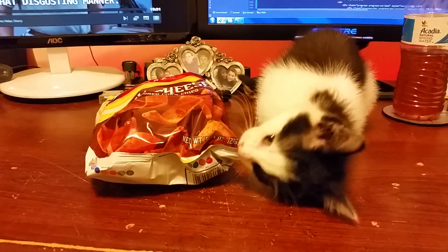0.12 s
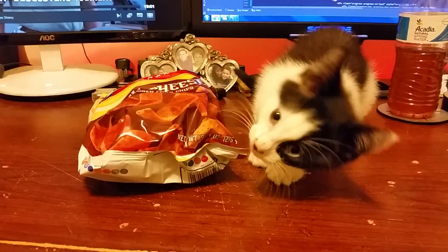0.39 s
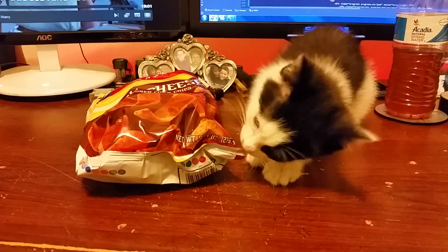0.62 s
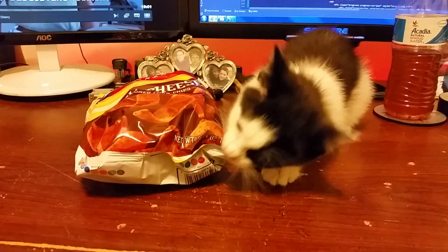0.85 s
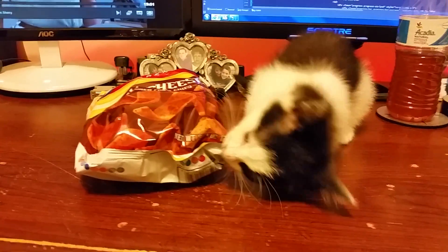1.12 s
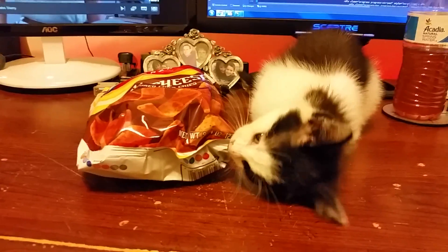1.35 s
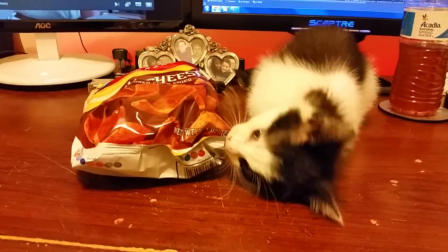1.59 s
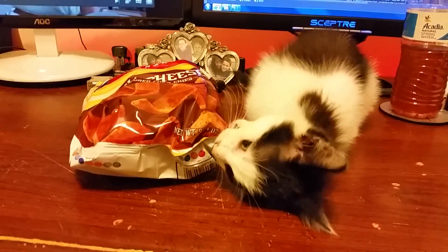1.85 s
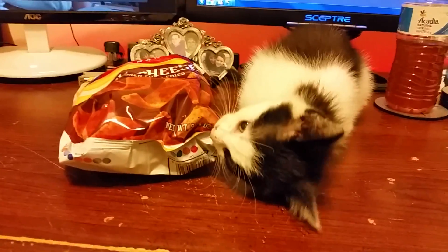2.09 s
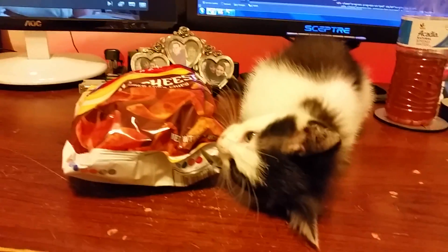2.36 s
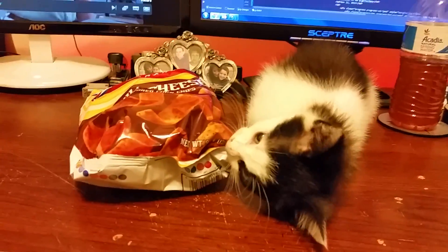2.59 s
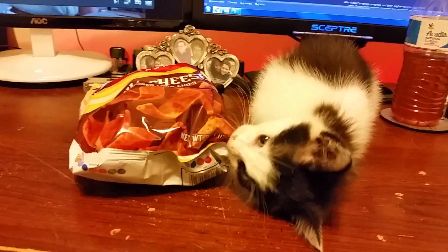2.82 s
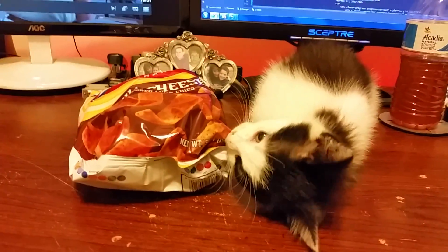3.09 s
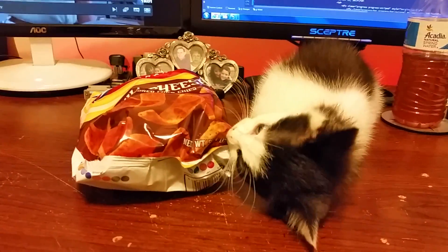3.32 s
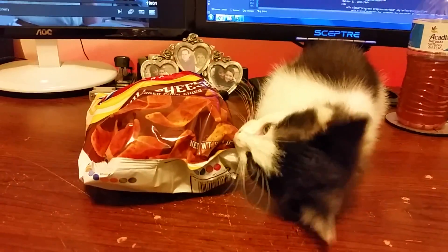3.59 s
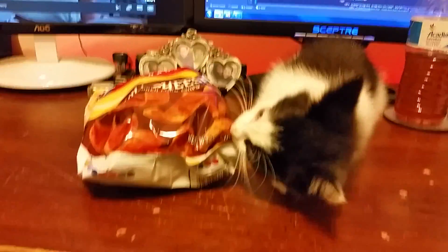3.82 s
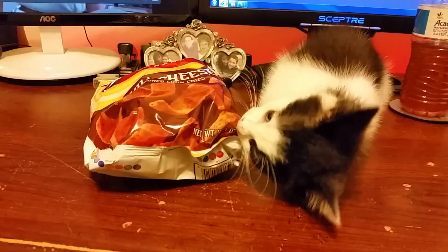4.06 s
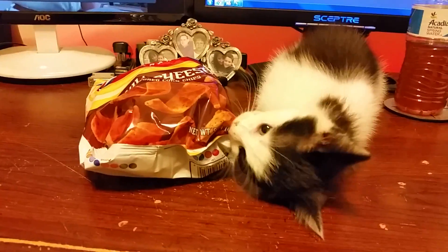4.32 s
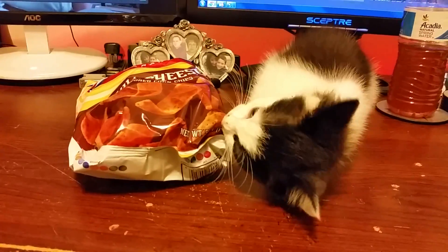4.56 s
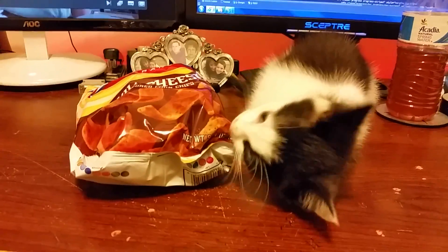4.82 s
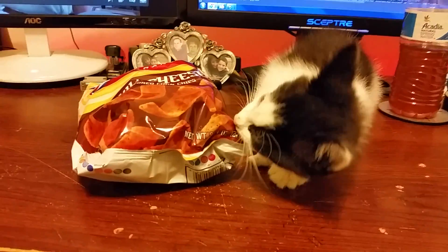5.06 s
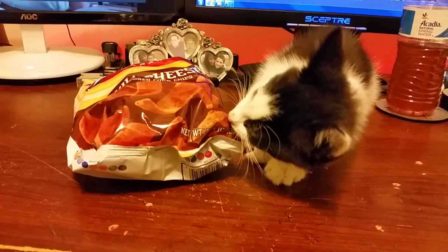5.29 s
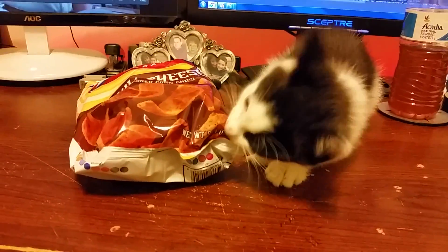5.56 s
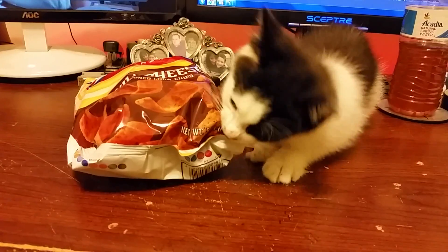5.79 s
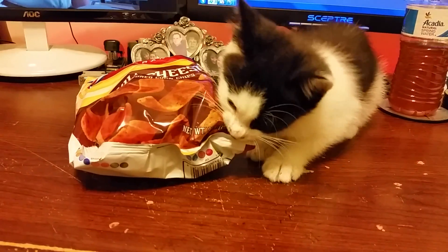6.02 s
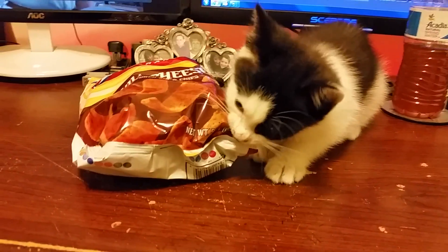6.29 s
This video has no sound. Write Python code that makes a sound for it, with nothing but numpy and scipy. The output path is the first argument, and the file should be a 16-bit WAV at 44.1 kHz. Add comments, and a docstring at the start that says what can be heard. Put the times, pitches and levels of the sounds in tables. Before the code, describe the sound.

Close crinkling of a stiff foil bag, tugged by a kitten, with snaps, tiny clicks, soft fur swishes and one dull desk knock.

```python
"""A foil snack bag crackles on a wooden desk in a small room as a kitten chews and tugs at its corner.
Each crease that buckles gives a click and a short rattle in five bands, with its own colour.
Random finer clicks rustle between, fur hisses as shaped noise, knocks ring the desk's resonances.
Walls answer with a short noise tail; two ports of a hand-held phone colour the bag differently.
Jolts are falling sine pulses; hand rumble, room air and fan hum are filtered noise."""
import sys
import numpy as np
from scipy import signal
from scipy.fft import rfft, irfft, next_fast_len
from scipy.io import wavfile

SR = 44100
rng = np.random.default_rng(int(sys.argv[2]) if len(sys.argv) > 2 else 0)


def undo_db(level):
    """Turn decibels back into plain size, where 20 dB means ten times bigger."""
    steps = np.asarray(level, float) / 20
    return 10 ** steps


def persist_wave(psi):
    """Save psi, clipped to +-1, as 16-bit WAV."""
    counts = np.round(np.clip(psi, -1, 1) * 32767).astype(np.int16)
    wavfile.write(sys.argv[1], SR, np.atleast_2d(counts).T)


N = 282681

# buckling creases, before radiation: t/s, crack/dB, edge/dB (>0 thin, sharp), body/dB (>0 large, hollow),
# bite/dB (>0 stiff, papery)
SNAPS = [(0.0656, -37.5, 7, -6.5, -4), (0.0835, -44, 0, 0, -5), (0.1608, -44.5, 2.5, -0.5, 0),
         (0.277, -41, 3, -7, -8), (0.3474, -41, 2, 8.5, -7), (0.791, -55, 2, 3.5, -4),
         (0.9671, -29.5, -3, 7, -16), (1.0331, -14, -0.5, -17.5, -4), (1.1387, -17, -3, -24, 14),
         (1.16, -16.5, 3, -11, 8), (1.2428, -37.5, -11, -19, 7), (1.256, -38.5, -2, 0, 10.5),
         (1.2597, -10, -10, -18, 5.5), (1.318, -33, 15, -2, 7.5), (1.3328, -35.5, 11, -8, 1),
         (1.4266, -39, -5.5, -13, 4.5), (1.5108, -39.5, 6, -7.5, 0), (1.526, -39, -5, -27, -3),
         (1.569, -34, 8.5, 5.5, 0.5), (1.6153, -39, -2, -18, 1), (1.6765, -37, -10, -17, -11),
         (1.7968, -26, 0, 4.5, -2.5), (1.8151, -37.5, 7.5, 6, 0.5), (1.8729, -32.5, 9, -2.5, 3),
         (1.9104, -34.5, 1.5, -0.5, 8.5), (1.9293, -40, -3, -16, -1), (1.9907, -39, -5, 8, 1.5),
         (1.9997, -23.5, 1.5, -10, 10), (2.0233, -34, -5, -5, 5.5), (2.0384, -36.5, -4, -10, -2),
         (2.049, -39, 9, 9, 2), (2.0972, -27.5, -2.5, -25, 1), (2.1201, -40, -1.5, -18, -18),
         (2.1368, -25, 6.5, -5, 10.5), (2.1808, -12.5, 0.5, -14, 0), (2.1954, -27, -1.5, 8, -1),
         (2.2416, -42.5, 0.5, 0, -4), (2.2878, -25.5, 5.5, -7, -4), (2.3282, -27.5, 8, 6.5, 0),
         (2.3718, -37, 6, 5, 6), (2.4045, -25, -2.5, -33, 1), (2.4657, -68, 5, 23.5, -1),
         (2.5285, -49, 8, -12.5, 0), (2.5918, -46.5, -5, -8.5, 1), (2.6671, -55, 10, 5, -2),
         (2.7652, -47.5, 13.5, -3.5, 1.5), (2.872, -29.5, 4.5, -9, -2), (2.918, -23.5, 3, -11, 1),
         (3.0452, -53.5, 6.5, -1.5, -10), (3.1119, -25, 4.5, -17, -6), (3.1816, -30, 8, 2.5, -11),
         (3.212, -39, 17, -18, -6), (3.2485, -22, 0, -1.5, -11), (3.256, -37.5, 12.5, 5.5, 5.5),
         (3.2755, -44.5, 9.5, -3, 1), (3.3022, -45.5, -0.5, -14, -3), (3.389, -37, 8.5, 6.5, -1.5),
         (3.4464, -29.5, 17.5, 5.5, 5), (3.481, -39.5, -1, -12, -3), (3.4859, -41, 12, -12, 2),
         (3.5287, -47.5, 14, 5, -7), (3.5383, -39.5, 0, -2, 7), (3.6233, -48, 25, 8, -3),
         (3.6266, -21, 14, 5, 1), (3.673, -48, 9.5, 7, 8), (3.6861, -37.5, 8.5, 5.5, 6),
         (3.693, -34.5, 11.5, -2, -4), (3.7191, -20, 6, -8, -1), (3.7233, -21, 11, -5.5, 5.5),
         (3.7372, -34.5, 10.5, 8, 7), (3.739, -19, 4, -14, 4), (3.7991, -39, 8, -2, -7.5),
         (3.8036, -20, 1.5, -7, -2), (3.8541, -44.5, -1, 3, -1), (3.8963, -20.5, 1, -4, 2),
         (3.9537, -35.5, 5, 5.5, -23), (3.9911, -32, 3, -4.5, 6), (4.0094, -53.5, 10.5, 14, -6),
         (4.0401, -42.5, 0.5, -7, -3), (4.1064, -49.5, 15.5, -7, -12), (4.193, -68.5, -3, 26, -19),
         (4.2769, -52, 10, 1, 0), (4.3736, -55, 17.5, 12, -9), (4.4069, -39.5, -6, 6, 5),
         (4.5043, -57.5, 16, 6, -1), (4.5288, -34.5, -1, -6, 1.5), (4.5587, -32.5, 5.5, 7, -17),
         (4.5647, -22, 4, -0.5, 1), (4.5985, -29, 10, 14, -0.5), (4.664, -13.5, 2, -23.5, 2),
         (4.7298, -12.5, 1.5, -27, -6), (4.743, -37, 3, -11, 5), (4.793, -43, 7, -17, 5),
         (4.7976, -44, 13, -12, 0), (4.84, -38, 12, -19, 7), (4.843, -38, 1.5, -24, -4),
         (4.8485, -42, 13.5, 8.5, 6.5), (4.8663, -36.5, 8.5, -5, -11), (4.9124, -25, 11.5, 2.5, 2.5),
         (4.9804, -58, 6.5, 12, 1), (4.9891, -46, 8.5, 4, 4.5), (5.3, -38, 13.5, 8.5, 1.5),
         (5.7019, -46.5, 16, -1, 1), (5.7139, -33, 14, 1, 2), (5.7994, -19.5, 6, -7, 5.5),
         (5.8609, -34, 12, 0.5, 7), (5.8798, -38, 4, -5, 0), (5.906, -46, 4.5, 1, 1),
         (5.923, -43, 11, -3, 3), (5.951, -17.5, 6.5, -14.5, 4.5), (5.9994, -45, 6, -9, 7),
         (6.0368, -23.5, 20.5, -4, 3), (6.109, -40, 1, -18, 11.5), (6.2083, -35, 6, -12.5, 4),
         (6.2524, -35, 1, -11, 6), (6.2562, -25, 6.5, -6.5, 0.5), (6.3317, -39.5, -2, -13, 6.5)]
# bands of a snap, top first: low f/Hz, high f/Hz, radiation/dB, rattle time constant/ms
SNAP_BANDS = [(11570, 19500, 13.5, 0.39), (7820, 10200, 12, 0.33), (3360, 7230, 22.5, 0.34),
              (1213, 3090, 13.5, 0.9), (350, 1900, 18, 3.6)]
# colour of a snap in those bands: plain snap/dB, share of edge/1, of body/1, of bite/1
SNAP_COLOUR = [(-1, 0.98, 0, 0.044), (-0.5, 0.036, 0.1, -0.01), (-5, 0.28, 0.5, 0.83),
               (-0.15, 0.014, 0.92, 0.023), (-18.5, 0.2, 0.79, -0.029)]
# strain of the foil under the teeth, as drive of the fine crackle before radiation: t/s, level/dB
STRAIN = [(0.0, -59), (0.46, -78.5), (0.9, -73.5), (1.15, -50), (1.62, -63), (1.89, -80), (2.21, -48),
          (2.43, -74), (2.8, -78), (3.32, -53.5), (3.82, -52.5), (4.2, -67), (4.75, -56), (5.05, -63.5),
          (5.39, -94), (5.73, -67), (5.9, -66), (6.3, -81)]
# strokes of fur on foil, noise before its bands: t/s, rise/s, fall/s, level/dB, darkness/dB re level
FUR_STROKES = [(0, 0.0031, 0.12, -50, 3), (.2, 0.045, 0.026, -49.5, 0), (.345, 0.013, 0.051, -43.5, -10),
               (0.789, 0.043, 0.0039, -40, -4.5), (0.945, 0.0023, 0.092, -35, 1.5),
               (3.63, 0.017, 0.09, -31.5, 3.5), (4.2, 0.084, 0.074, -47, 1), (4.37, 0.033, 0.047, -43.5, 0),
               (4.48, 0.031, 0.065, -43, 1.5), (5.61, 0.048, 0.098, -53.5, 0.5),
               (5.8, 0.0097, 0.056, -35, -2.5), (5.855, 0.0058, 0.043, -28, -4),
               (5.955, 0.0095, 0.045, -24, -9), (6.04, 0.013, 0.076, -27, -13)]
# jolts of the hand at one port or the other: t/s, starting level/dB, t60/s, left-right/dB
JOLTS = [(.51, -42, 0.027, -13), (2.313, -39.5, 0.03, -12), (2.836, -43, 0.023, 19),
         (3.219, -38, 0.034, 20.5), (3.6231, -19, 0.012, 19), (3.742, -38, 0.035, -8),
         (3.775, -37.5, 0.055, -12), (3.84, -40, 0.044, -7), (4.43, -37, 0.021, -7),
         (4.847, -37, 0.023, 17), (5.625, -45.5, .034, 19), (5.667, -41, 0.028, -13),
         (5.704, -37.5, 0.027, -14)]
# bag on the desk: t/s, level/dB
KNOCKS = [(0.9467, -25.5), (0.966, -6), (6.2556, -25.5)]
# desk-top modes: f/Hz, starting level re knock/dB, width/Hz
DESK_MODES = [(147, -8, 100), (270, 0.5, 105), (400, -2, 170), (613, -3, 160), (847, -2.5, 190),
              (1600, -17, 170)]
# walls; the left port faces the bag, so its treble is drier: f/Hz, t60/s, left/dB, right/dB
WALLS = [(350, 0.23, 0.5, 0.5), (1200, 0.21, -1.5, -0.5), (2313, 0.25, 1, -4), (5000, 0.23, -10, -2.5),
         (11900, .18, -8, -3)]
# single reflections before their high band: delay/ms, left/dB, right/dB
ECHOES = [(2.143, -14, -5.5), (3.914, -16, -8.5), (9.805, -31, -20.5), (11.25, -27, -18.5),
          (13.96, -35.5, -21), (17.6, -30.5, -11.5), (19.23, -16, -18), (20.1, -22.5, -15),
          (48.3, -30, -17.5)]
# gain of the microphone ports: f/Hz, left/dB, right/dB
PORTS = [(300, -15, -14.5), (1135, -16, -16), (1944, -14.5, -13), (2248, -10.5, 3.5), (2754, -15, -7),
         (3050, -29.5, -10.5), (3560, -16, -13), (5440, -36.5, -18.5), (7800, -22.5, -21.5),
         (8660, -2, -35.5), (9480, 3, -16.5), (10700, -5.5, -12), (11830, 2, -8.5), (15300, -8.5, -19.5)]
# relative spectrum of fan and room air: f/Hz, density/dB per Hz
AIR_SPECTRUM = [(20, -10), (60, -2), (110, -5), (230, -5.5), (390, -12.5), (480, -32.5), (780, -21),
                (1200, -38.5), (2250, -23), (2950, -39), (3600, -24.5), (6500, -56.5), (12200, -36.5),
                (14500, -41)]
# left-right likeness of the air: f/Hz, correlation/1
AIR_LIKENESS = [(60, 0.27), (130, 0.25), (300, 1), (640, 0.45), (1400, .03)]
# fan-motor tones: f/Hz, rms/dB, width of each of two resonances/Hz
FAN_TONES = [(120.4, -63.5, 5.7), (216.4, -66, 25), (391.3, -72.5, 7.1)]
# low rumble of the hand that holds the phone: t/s, rms/dB
HAND_RUMBLE = [(0.0, -53), (0.571, -57), (0.93, -52.5), (1.5, -67), (2.12, -61), (2.82, -74), (3.36, -56),
               (3.77, -52.5), (4.19, -58.5), (4.53, -54), (5.43, -63), (5.801, -54), (6.34, -68.5)]

SPOT_SPREAD_MS = 0.05   # standard deviation: creases lie at different spots, so the path to the right port varies
SETTLING_DB, SETTLING_S = -33, 0.032   # creases around a snap settle: level re snap, time constant
FIRST_WALL_MS, BUILD_UP_MS, ECHO_LOW_HZ = 1.4, 3.4, 3720
HALLWAY_DB, HALLWAY_T60_RATIO = -14, 2.6   # weaker, slower tail from the space beyond
RIGHT_LAG_MS = 0.167
AIR_RMS_DB = -59


def band(x, low_hz, high_hz):
    """Butterworth band-pass."""
    return signal.sosfilt(signal.butter(2, [low_hz, high_hz], "band", fs=SR, output="sos"), x + 1e-18)


def resonance(x, hz, width_hz):
    """Two-pole resonance with gain 1 on top."""
    r = np.exp(-np.pi * width_hz / SR)
    poles = [1, -2 * r * np.cos(2 * np.pi * hz / SR), r * r]
    return signal.lfilter([(1 - r * r) / 2, 0, (r * r - 1) / 2], poles, x + 1e-18)


def rms_one(x):
    """Scale to rms 1."""
    return x / np.sqrt(np.mean(x ** 2) + 1e-20)


def at_hz(points, hz, column=1):
    """Read a table on a log-frequency axis."""
    points = np.array(points)
    return np.interp(np.log(np.maximum(hz, 1)), np.log(points[:, 0]), points[:, column])


def at_time(points):
    """Read a table of t/s, level/dB at every sample, as gain."""
    return undo_db(np.interp(np.arange(N) / SR, *np.transpose(points)))


def sides(pan_db):
    """Left and right gains for a left-right difference."""
    return undo_db(np.array([pan_db, -pan_db]) / 2)


def train(times_s, sizes):
    """Stereo one-sample clicks at given times."""
    out = np.zeros((2, N))
    at = np.minimum(np.round(times_s * SR).astype(int), N - 1)
    np.add.at(out, ([[0], [1]], at), sizes)
    return out


def rustle(median_per_s=1100, spread_db=3.5, clumps_db=3.5, bright_db=-7.5, dark_db=2.5, low_db=-2.5):
    """Tiny creases click at random, in clumps, with the strain and for a moment after each snap."""
    s, crack_db, edge_db, *_ = np.transpose(SNAPS)
    shocks = train(s, undo_db(crack_db + np.maximum(edge_db, 0) + SETTLING_DB))[0]
    settling = signal.lfilter([1], [1, -np.exp(-1 / (SETTLING_S * SR))], shocks + 1e-18)
    level = settling + at_time(STRAIN)
    clumps = rms_one(band(rng.standard_normal(N), 6, 34))
    born = rng.random(N) < median_per_s * undo_db(clumps_db * clumps) / SR
    sizes = undo_db(spread_db * np.minimum(rng.exponential(1, N), 5))
    clicks = rms_one(born * sizes * rng.choice([-1, 1], N))
    bright = band(clicks, 7950, 15000)
    dark = band(clicks, 2800, 8740) + undo_db(low_db) * band(clicks, 420, 2750)
    radiation = undo_db(SNAP_BANDS[0][2])
    return level * radiation * (undo_db(bright_db) * bright + undo_db(dark_db) * dark)


def swishes(grain_db=5.5):
    """Fur slides over the foil: a soft grainy hiss that swells and stops, unlike at the two ports."""
    t, bright, dark = np.arange(N) / SR, 0, 0
    for s, rise_s, fall_s, level_db, dark_db in FUR_STROKES:
        stroke = np.interp(t, [s, s + rise_s, s + rise_s + fall_s], [0, 1, 0])
        bright = bright + undo_db(level_db) * stroke
        dark = dark + undo_db(level_db + dark_db) * stroke
    grain = rms_one(band(rng.standard_normal(N), 50, 400))
    fur = rng.standard_normal((2, N)) * undo_db(grain_db * grain)
    return bright * band(fur, 9000, 16000) + dark * band(fur, 500, 8700)


def air():
    """Steady broad noise of fan and room, most alike on both sides near 300 Hz."""
    size = next_fast_len(N)
    hz = np.arange(size // 2 + 1) * SR / size
    mid, side = rfft(rng.standard_normal((2, size))) * undo_db(at_hz(AIR_SPECTRUM, hz))
    alike = np.clip(at_hz(AIR_LIKENESS, hz), 0, 1)
    spectra = np.sqrt(1 + alike) * mid + np.sqrt(1 - alike) * side * [[1], [-1]]
    return undo_db(AIR_RMS_DB) * rms_one(irfft(spectra, size)[:, :N])


def fan_hum():
    """Fan-motor tones waver: noise through narrow resonances, twice each."""
    white, hum = rng.standard_normal(N), 0
    for hz, rms_db, width_hz in FAN_TONES:
        tone = resonance(resonance(white, hz, width_hz), hz, width_hz)
        hum = hum + undo_db(rms_db) * rms_one(tone)
    return hum


def hand_rumble():
    """The holding hand rumbles: low noise, mostly its own in each port."""
    own, shared = rng.standard_normal((2, N)), rng.standard_normal(N)
    return at_time(HAND_RUMBLE) * rms_one(band(own + 0.8 * shared, 45, 311))


def snaps(rattle_db=-1.5, facing_spread_db=2.2):
    """A buckling crease cracks for one sample, then rattles; colour and facing to the ports vary."""
    s, crack_db, *traits_db = np.transpose(SNAPS)
    arrival_s = s + [[0], [SPOT_SPREAD_MS / 1000]] * rng.standard_normal(len(s))
    out, rattle = 0, rng.standard_normal(N)
    facing_db = rng.normal(0, facing_spread_db, (len(s), len(SNAP_BANDS)))
    for k, (low_hz, high_hz, radiation_db, rattle_ms) in enumerate(SNAP_BANDS):
        plain_db, *shares = SNAP_COLOUR[k]
        level_db = crack_db + plain_db + np.dot(shares, traits_db) + radiation_db
        cracks = train(arrival_s, undo_db(level_db) * sides(facing_db[:, k]))
        decay = np.exp(-1 / (rattle_ms * SR / 1000))
        dying = signal.lfilter([0, 1], [1, -decay], cracks + 1e-18)
        width = 2 * (high_hz - low_hz) / SR   # height of a unit click after the band
        burst = cracks / width + undo_db(rattle_db) * dying * rattle / np.sqrt(width)
        out = out + band(burst, low_hz, high_hz)
    return out


def jolts():
    """Each jolt of the hand is a dying sine pulse that falls towards 101 Hz; shorter ones start higher."""
    t, out = np.arange(SR // 8) / SR, np.zeros((2, N + SR))
    for s, start_db, t60_s, pan_db in JOLTS:
        extra_turns = (4.7 / t60_s - 55) * 0.0037 * (1 - np.exp(-t / 0.0066))
        pulse = undo_db(-60 * t / t60_s) * np.sin(2 * np.pi * (101 * t + extra_turns))
        at = round(s * SR)
        out[:, at:at + len(t)] -= undo_db(start_db) * sides(pan_db)[:, None] * pulse
    return out[:, :N]


def knock():
    """The bag strikes the desk top, whose modes ring briefly with alternating sign."""
    s, level_db = np.transpose(KNOCKS)
    blow, out = -train(s, undo_db([level_db, level_db])), 0
    for k, (hz, mode_db, width_hz) in enumerate(DESK_MODES):
        ring = resonance(blow, hz, width_hz) * SR / width_hz / np.pi   # a unit click starts near 1
        out = out + (-1) ** k * undo_db(mode_db) * ring
    return out


def room(x):
    """Single treble reflections within a diffuse wall tail: noise builds up and dies in octave bands."""
    t = np.arange(SR // 2) / SR
    edges_hz, white = 120 * 2. ** np.arange(8), rng.standard_normal((2, len(t)))
    late_s = np.maximum(t - FIRST_WALL_MS / 1000, 0)
    build_up = 1 - np.exp(-late_s / (BUILD_UP_MS / 1000))
    answer = np.zeros((2, len(t)))
    for delay_ms, left_db, right_db in ECHOES:
        answer[:, round(delay_ms * SR / 1000)] = undo_db([left_db, right_db])
    answer = band(answer, ECHO_LOW_HZ, 22000)
    for low_hz, high_hz in zip(edges_hz, edges_hz[1:]):
        centre_hz = np.sqrt(low_hz * high_hz)
        t60_s, left_db, right_db = (at_hz(WALLS, centre_hz, column=c) for c in range(1, 4))
        fall_db = -60 * late_s / t60_s
        dying = build_up * (undo_db(fall_db) + undo_db(HALLWAY_DB + fall_db / HALLWAY_T60_RATIO))
        tail = band(white, low_hz, high_hz) * dying / np.linalg.norm(dying)
        answer += undo_db([[left_db], [right_db]]) * tail
    return signal.oaconvolve(x.mean(0)[None], answer, axes=1)[:, :N]


def ports(x, size=2048):
    """Each port is a small cavity with its own peaks; the right one is farther off and lags."""
    hz = np.arange(size // 2 + 1) * SR / size
    gains = undo_db([at_hz(PORTS, hz, column=1), at_hz(PORTS, hz, column=2)])
    cepstrum = irfft(np.log(gains))   # folded below for minimum phase
    cepstrum[:, 1:size // 2] *= 2
    cepstrum[:, size // 2 + 1:] = 0
    lag = np.exp(-2j * np.pi * hz * np.array([[0], [RIGHT_LAG_MS / 1000]]))
    response = irfft(np.exp(rfft(cepstrum)) * lag)
    return signal.oaconvolve(x, response, axes=1)[:, :N]


def scene():
    """Bag and desk sound in the room and reach the ports; hand, air and fan come on top."""
    bag = rustle() + swishes() + snaps() + knock()
    return ports(bag + room(bag)) + air() + fan_hum() + hand_rumble() + jolts()


def low_pass(x):
    """Removes everything above the highest recorded frequency."""
    return signal.sosfilt(signal.butter(12, 16470, fs=SR, output="sos"), x)


def record(dry):
    """A low-pass takes the top down by at least 26 dB from 14850 Hz up."""
    mix = signal.sosfilt(signal.cheby2(8, 26, 14850, fs=SR, output="sos"), dry)
    return low_pass(mix)


dry = scene()
out = record(dry)
persist_wave(out)
```